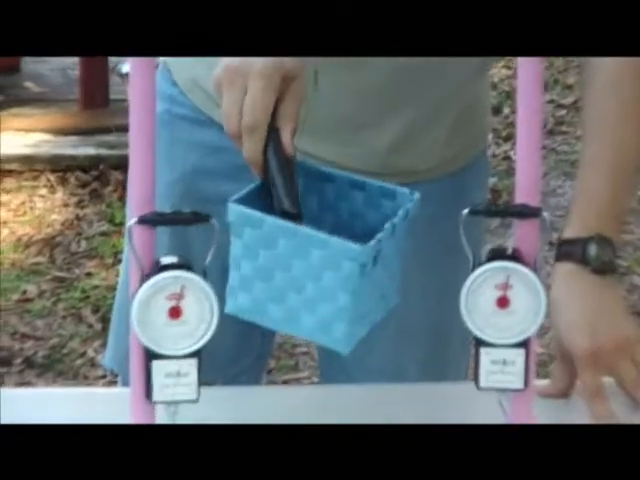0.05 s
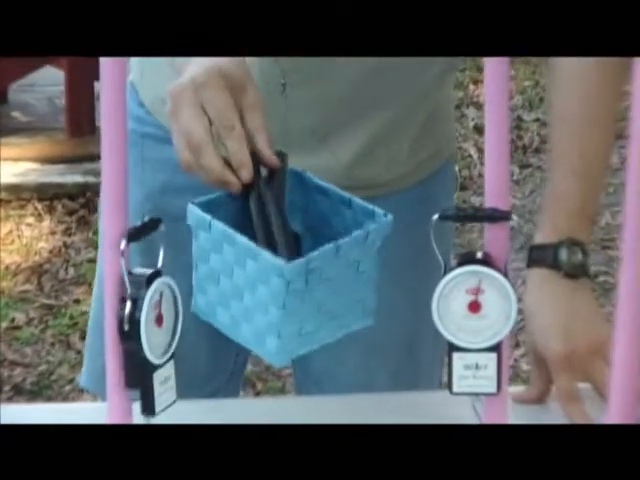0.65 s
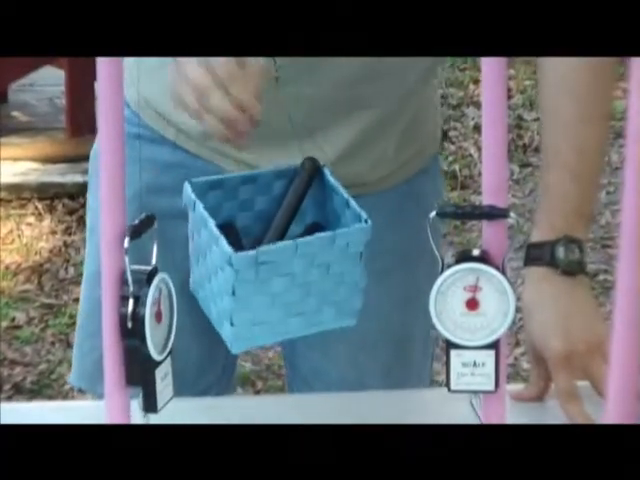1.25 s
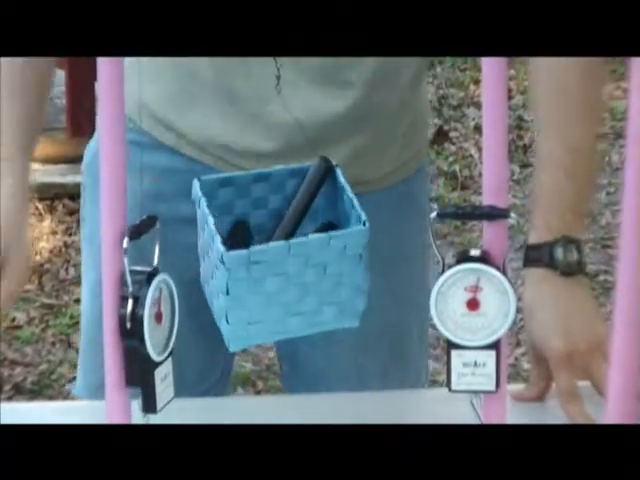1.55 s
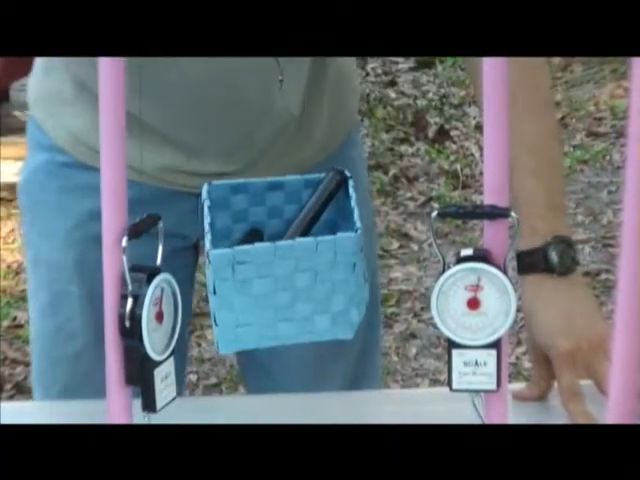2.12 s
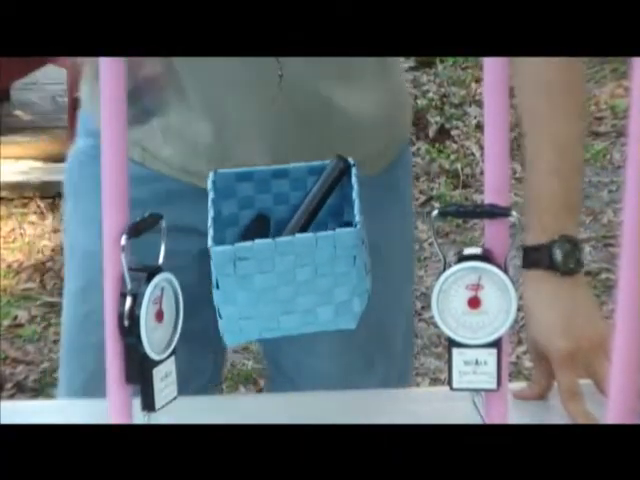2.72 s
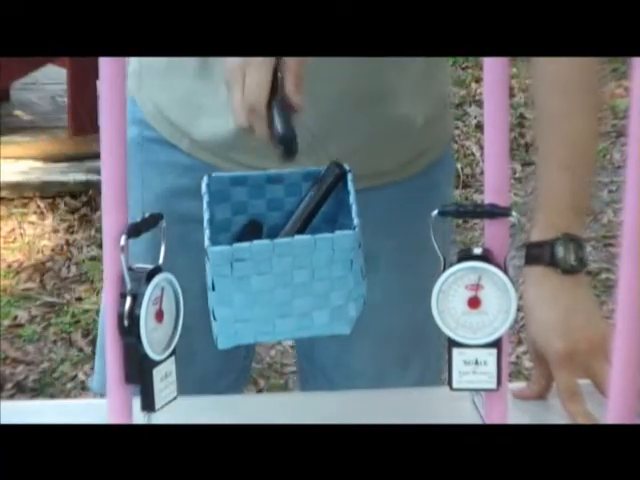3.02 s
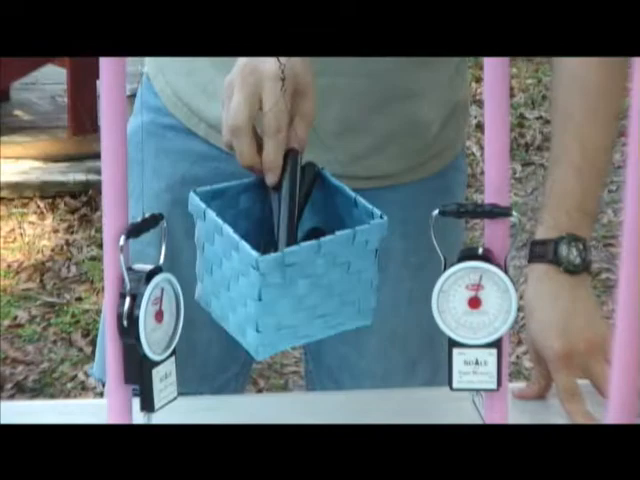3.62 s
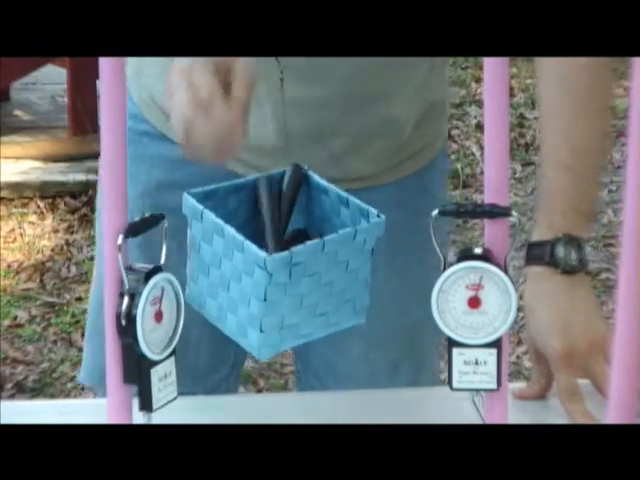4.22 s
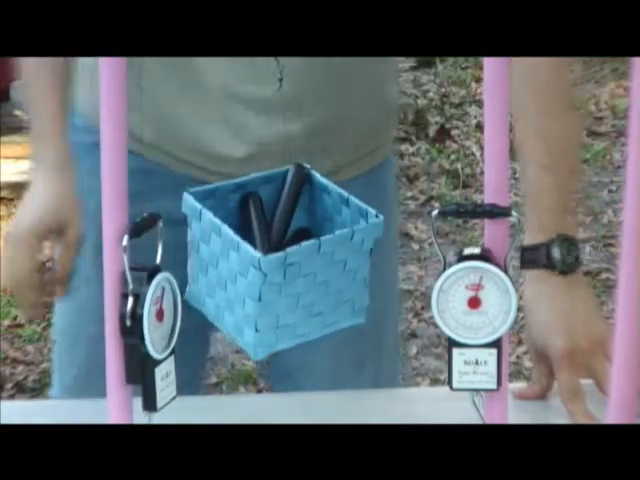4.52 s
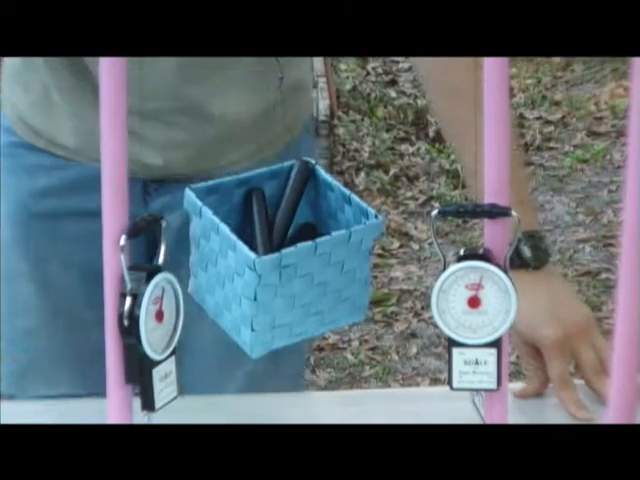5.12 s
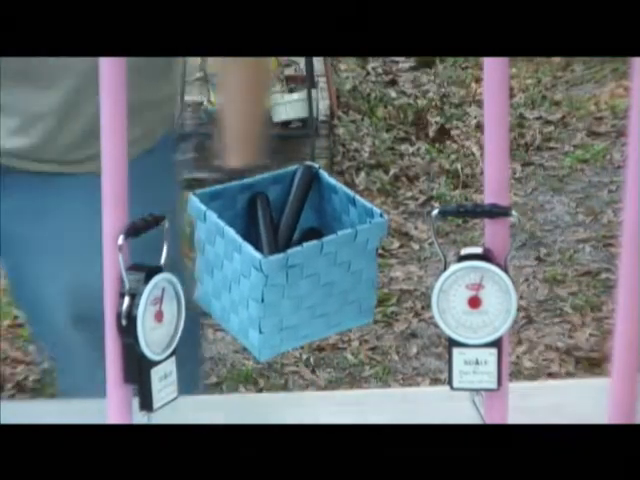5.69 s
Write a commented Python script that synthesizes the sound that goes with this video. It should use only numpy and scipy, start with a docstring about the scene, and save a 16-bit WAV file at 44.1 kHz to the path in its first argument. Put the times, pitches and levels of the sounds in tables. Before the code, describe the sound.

Metal weights clatter into a plastic basket in two bunches, with a drag across a table between, two close snaps and birds chirping.

```python
"""Steel rod weights clink, chatter and squeal as they are lowered one by one into a woven plastic basket.
Each contact rings a rod and the pile and shakes the basket, which hangs in a yard; rods rub on the weave.
Between two loads the next rod knocks and drags over a table. Clothes rustle, two dry snaps sound at the
microphone, and birds chip and call over outdoor air and a distant motor's hum."""
import sys
import numpy as np
from scipy import signal
from scipy.fft import rfft, irfft, next_fast_len
from scipy.io import wavfile
from scipy.ndimage import map_coordinates

SR = 44100
rng = np.random.default_rng(int(sys.argv[2]) if len(sys.argv) > 2 else 0)


def inscribe(sig):
    """Save sig as 16-bit PCM at rate SR to the path in sys.argv[1].

    A 1-D sig is mono; a 2-D sig holds one channel per row.
    Samples are clipped to [-1, 1] before scaling.
    """
    pcm = np.round(np.clip(np.atleast_2d(sig).T, -1, 1) * 32767)
    wavfile.write(sys.argv[1], SR, pcm.astype(np.int16))


N = 258173


def amp(db):
    """Decibels to gain."""
    return 10 ** (np.asarray(db) / 20)

def unit(x):
    """Scale to rms 1."""
    return x / np.sqrt(np.mean(x ** 2) + 1e-20)

def along(points, hz):
    """Interpolate (frequency, value) points on a log axis."""
    knots_hz, values = np.transpose(points)
    return np.interp(np.log(hz + 1), np.log(knots_hz + 1), values)

def wobble(rate_hz, size=N):
    """Smooth random curve, rate_hz knots a second."""
    knots = rng.standard_normal(int(size * rate_hz / SR) + 4)
    return map_coordinates(knots, [np.arange(size) * rate_hz / SR])

def filtered(x, response):
    """Apply a complex frequency response."""
    size = x.shape[-1]
    padded = next_fast_len(size + 8192)
    return irfft(rfft(x, padded) * response(np.fft.rfftfreq(padded, 1 / SR)), padded)[..., :size]

def band(x, low_hz, high_hz):
    """Causal band-pass."""
    return signal.sosfilt(signal.butter(2, [low_hz, high_hz], "bandpass", fs=SR, output="sos"), x)

def resonate(x, resonances):
    """Parallel resonators of alternating sign."""
    return filtered(x, lambda f: sum(
        (-1) ** k * amp(db) * 1j * f * width_hz / (hz * hz - f * f + 1j * f * width_hz)
        for k, (hz, width_hz, db) in enumerate(resonances)))

def noise(spectrum, size=N, grain_db=0):
    """Coloured noise of rms 1; grain_db breaks it into tiny slips."""
    slips = rng.standard_normal(size) * amp(grain_db * wobble(700, size))
    return unit(filtered(slips, lambda hz: amp(along(spectrum, hz))))

def pulse(spectrum, size=2048):
    """Minimum-phase click, peak 1."""
    hz = np.fft.rfftfreq(size, 1 / SR)
    cepstrum = irfft(np.log(amp(along(spectrum, hz))))
    log_response = rfft(2 * cepstrum[1:size // 2], size) * np.exp(-2j * np.pi * hz / SR)
    click = irfft(np.exp(log_response))
    return click / np.abs(click).max()

def add(track, s, sound):
    """Mix a sound in at s seconds."""
    part = track[max(round(s * SR), 0):][:len(sound)]
    part += sound[:len(part)]

def strokes(rows, rise_s, t60_s, size=N):
    """Envelope of strokes that rise, hold and decay."""
    t = np.arange(size) / SR
    return sum(amp(db - 60 * np.maximum(t - s - length_s, 0) / t60_s) * np.clip((t - s) / rise_s, 0, 1)
               for s, length_s, db in rows)

def ring(modes, lift_db=0, above_hz=5000, scatter_db=0, detune=0, rattle=0):
    """Damped modes; hard contact lifts the upper ones, a loose seat jostles phase and level."""
    t = np.arange(SR // 3) / SR
    hz, db, t60_s = np.transpose(modes)[:, :, None]
    db = db + lift_db * (hz > above_hz) + scatter_db * rng.standard_normal(hz.shape)
    hz = hz * (1 + detune * rng.standard_normal(hz.shape))
    jostle = rattle * wobble(173, len(t))
    phase = 2 * np.pi * hz * t + jostle * rng.choice([-1, 1], hz.shape)
    return np.exp(jostle[::-1] / 2) * np.sum(amp(db - 60 * t / t60_s) * np.sin(phase), axis=0)

def whistle(length_s, first_hz, last_hz, waver, overtone_db):
    """Swelling, gliding, unsteady tone with two overtones."""
    progress = np.linspace(0, 1, int(length_s * SR))
    glide_hz = first_hz + (last_hz - first_hz) * np.sin(np.pi / 2 * progress)
    hz = glide_hz * (1 + waver * wobble(600, len(progress)))
    phase = 2 * np.pi * np.cumsum(hz) / SR
    return np.sin(np.pi * progress) * sum(amp(k * overtone_db) * np.sin((k + 1) * phase) for k in range(3))


# air spectrum: (frequency [Hz], gain [dB])
AIR_SPECTRUM = [(15, -36), (25, -15), (45, -14), (70, -6), (110, -8), (160, -3.5), (335, -4), (600, -2.5),
                (950, -9), (1300, -4), (1900, -10.5), (3600, -16), (9300, -22), (16000, -26.5)]
# left-right likeness: (frequency [Hz], correlation [-1..1])
AIR_CORRELATION = [(60, .93), (180, .88), (550, .87), (1650, .65), (5000, .35), (15000, -.3)]

def air(level_db=-54.4):
    """Outdoor air, wider in the treble."""
    def spread(hz):
        angle = np.arccos(along(AIR_CORRELATION, hz)) / 2
        return np.array([np.cos(angle), np.sin(angle)])
    mid, side = filtered(np.array([noise(AIR_SPECTRUM), noise(AIR_SPECTRUM)]), spread)
    return amp(level_db + 1.1 * wobble(6.1)) * unit(np.array([mid + side, mid - side]))

# motor partials: (frequency [Hz], rms level [dB])
MOTOR_PARTIALS = [(74, -67), (149, -67), (295, -74), (465, -74), (560, -76)]

def motor():
    """A distant motor hums, slightly unsteady."""
    clock_s = np.cumsum(1 + .02 * wobble(6)) / SR
    return sum(amp(db + 1.5 * wobble(2)) * np.sqrt(2) * np.sin(2 * np.pi * hz * clock_s)
               for hz, db in MOTOR_PARTIALS)

# rod on weave: (time [s], length [s], level [dB])
RUBS = [(0, 0.097, -45), (.55, 0.28, -51), (.98, .13, -48), (1.23, 0.055, -54), (3.49, 0.31, -47),
        (4.045, .16, -46), (4.38, .08, -51)]
# friction spectrum: (frequency [Hz], gain [dB])
RUB_SPECTRUM = [(70, -24.5), (170, -5), (550, 3), (1100, -2), (2200, -7.5), (4500, -15.5), (9000, -26.5),
                (16000, -30)]

def rubs():
    """A rod is eased down the weave in tiny slips."""
    return strokes(RUBS, rise_s=.014, t60_s=.22) * noise(RUB_SPECTRUM, grain_db=5)

# free modes by rod: (frequency [Hz], gain [dB], t60 [s])
ROD_MODES = { "long": [(3782, 0, .26), (5900, -23, .13), (7660, -29, .25), (9799, -6, .11),
             (11036, -21, .16), (13700, -23, .1)], "thick": [(4025, 0, .2), (6379, -24, .12),
             (7946, -24, .18), (10370, -16, .09), (10860, -22, .1), (11340, -22, .1)],
             "middle": [(4129, 0, .22), (6508, -20, .22), (8027, -25, .26), (10406, -8, .18),
             (11600, -28, .18), (14312, -21, .15)], "short": [(4243, 0, .28), (7461, -32, .25),
             (8142, -21, .25), (10810, -21, .2), (11360, -33, .25), (12040, -27, .23)], }
# modes of rods pressed together: (frequency [Hz], gain [dB], t60 [s])
PILE_MODES = [(4040, -16.5, 0.12), (4196, -7.5, .12), (4190, -5, 0.14), (4360, -5.5, 0.14),
              (4240, -6.5, .11), (4567, -1.5, 0.045), (6550, -21.5, .08), (8410, -15.5, 0.093),
              (8900, -28, .09), (11300, -24.5, .12), (11300, -25.5, .1), (12400, -21, .09),
              (14500, -29.5, .1)]
# contact crack: (frequency [Hz], gain [dB])
CRACK_SPECTRUM = [(100, -27.5), (600, -18.5), (1500, -6.5), (3200, 0.5), (4400, -3), (6000, -10),
                  (7500, -11), (10500, -31.5), (16000, -32.5)]
# extra bite of a heavy blow: (frequency [Hz], gain [dB])
BITE_SPECTRUM = [(2000, -35.5), (4200, -16), (5200, -1), (6100, -0.5), (7200, -18.5), (12000, -30),
                 (16000, -39)]
# shaken weave: (frequency [Hz], gain [dB])
WEAVE_SPECTRUM = [(60, -10.5), (160, 0), (550, -2.5), (1000, -9.5), (2200, -6), (4500, -0.5), (7000, -8),
                  (11000, -13.5), (16000, -16.5)]
# hollow basket notes: (frequency [Hz], width [Hz], gain [dB])
BASKET_RESONANCES = [(176, 66, -3), (241, 40, -3), (334, 50, -7.5), (508, 60, -7.5), (558, 110, 1),
                     (710, 98, -9)]
# rod on rod: (time [s], rod, blow [dB], rod ring [dB], overtone lift [dB], pile ring [dB])
CLINKS = [ (.001, "thick", -29, -32, -3, -43), (.077, "thick", -30, -38, -9, -33),
          (0.0878, "thick", -12, -26, 4, -27), (.558, "long", -40, -42, -18, -52),
          (0.593, "middle", -21, -32, -6, -34), (.678, "long", -22, -40, -3, -31),
          (0.7455, "middle", -19.5, -26, -4, -29), (.771, "long", -10.5, -25, 3, -20),
          (0.805, "long", -20, -42, 4, -50), (.8488, "long", -13, -39, 24, -27),
          (.9626, "middle", -5.5, -23, 3, -45), (.966, "long", -32, -24, 1, -22),
          (1.0329, "middle", -19.5, -27, 0, -29), (2.058, "long", -28, -43, -15, -39),
          (2.374, "short", -15, -38.5, -10, -42), (2.418, "short", -31, -39, -7, -37),
          (2.584, "short", -40, -51, -7, -52), (2.887, "short", -27, -60, 2, -48),
          (3.273, "short", -32, -53, 2, -55), (3.486, "short", -18, -25, -3.5, -35),
          (3.574, "short", -20, -29, 4, -41), (3.676, "short", -22, -50, 5, -38),
          (3.691, "short", -16, -29, -1, -30), (3.764, "short", -25.5, -50, 0, -37),
          (3.7934, "short", -29, -52, -6, -42), (4.132, "short", -15.5, -34.5, 0.5, -31),
          (4.197, "short", -11, -27, 8, -18), (4.239, "short", -19, -42, 12, -34),
          (4.42, "short", -34, -46, -4, -48), ]

def clinks(grip_db_per_s=18, shake_t60_s=.11, chatter_t60_s=.012, thud_t60_s=.14, firm_db=-32):
    """Each contact cracks, chatters, rings one rod and the pile, and shakes the basket."""
    out, thuds, t = np.zeros(N), np.zeros(N), np.arange(SR // 7) / SR
    crack, bite = pulse(CRACK_SPECTRUM), pulse(BITE_SPECTRUM)
    for s, rod, blow_db, ring_db, lift_db, pile_db in CLINKS:
        clink = amp(ring_db) * ring(ROD_MODES[rod], lift_db, scatter_db=.5, detune=.00018, rattle=.22)
        clink += amp(pile_db) * ring(PILE_MODES, scatter_db=1.5, detune=.0099, rattle=1)
        age_s = np.arange(len(clink)) / SR
        clink *= amp(-grip_db_per_s * age_s)  # fingers and weave drain the ring
        weave = amp(blow_db - 20 - 60 * t / shake_t60_s) * noise(WEAVE_SPECTRUM, len(t), grain_db=.5)
        chatter = amp(blow_db - 60 * t / chatter_t60_s) * noise(CRACK_SPECTRUM, len(t), grain_db=2.5)
        add(clink, 0, weave + .26 * chatter)
        rise_s = .001 * amp(.66 * (firm_db - blow_db))  # lighter blows build more slowly
        add(out, s, (1 - np.exp(-age_s / rise_s)) * clink)
        add(out, s, amp(-2 + 1.13 * blow_db) * crack)
        add(out, s, amp(9 + 2.6 * blow_db) * bite)
        add(thuds, s, amp(-19 + .46 * blow_db - 60 * t / thud_t60_s) * rng.standard_normal(len(t)))
    return out + resonate(thuds, BASKET_RESONANCES)

# dull knocks: (time [s], level [dB], hardness [dB])
KNOCKS = [(.004, -25, -19), (1.071, -39, 11.5), (1.4678, -18, -18.5), (1.883, -21, -28), (2.179, -36, 5),
          (2.217, -30, 6), (2.326, -26, -12), (2.351, -26, -20), (2.372, -27, -19), (5.467, -36.5, -9.5),
          (5.57, -38, -13)]
# knock modes: (frequency [Hz], gain [dB], t60 [s])
KNOCK_MODES = [(333, -18.5, 0.024), (622, -2, 0.015), (701, -13.5, 0.091), (1160, -1, .008),
               (2400, -6.5, 0.0079)]

def knocks(bounce_s=.021, bounce_db=-15):
    """A rod knocks on the table and bounces once."""
    out = np.zeros(N)
    for s, db, hard_db in KNOCKS:
        for at_s, level_db in (s, db), (s + bounce_s, db + bounce_db):
            add(out, at_s, amp(level_db) * ring(KNOCK_MODES, hard_db, above_hz=1000, detune=.04))
    return band(out, 305, 4700)

# steel slipping on steel: (time [s], pitch [Hz], level [dB])
SQUEALS = [(.0845, 4510, -13.5), (2.004, 4570, -22), (2.249, 4520, -29.5), (2.366, 4195, -24),
           (3.687, 4340, -27), (4.127, 4530, -21), (4.193, 4410, -15), (4.225, 4320, -28)]
# steel friction hiss: (frequency [Hz], gain [dB])
STEEL_SPECTRUM = [(1200, -20), (2300, -6), (3500, -10.5), (4250, 14), (5000, -9.5), (6300, -18),
                  (7300, -14), (8200, -11), (10800, -19), (16000, -27.5)]

def squeals(slip_s=.016, ring_t60_s=.09, partner_ratio=.91, partner_db=-14):
    """Two rods squeal as one slips over the other; the upper note rings on."""
    out, size = np.zeros(N), int(slip_s * SR)
    window = signal.windows.tukey(size)
    for s, hz, db in SQUEALS:
        for pitch_hz, level_db in (hz, db), (hz * partner_ratio, db + partner_db):
            add(out, s, amp(level_db) * whistle(slip_s, pitch_hz, pitch_hz, waver=.018, overtone_db=-26))
        add(out, s + slip_s / 2, amp(db - 19) * ring([(hz, 0, ring_t60_s)], rattle=.91))
        add(out, s, amp(db - 11.5) * window * noise(STEEL_SPECTRUM, size, grain_db=8.5))
        add(out, s, amp(db - 22.5) * window * noise(WEAVE_SPECTRUM, size, grain_db=2.5))
    return out

# bird chips: (time [s], start pitch [Hz], level [dB])
CHIPS = [(.432, 5070, -51), (1.725, 5400, -56), (1.94, 5200, -53.5), (2.678, 5400, -56),
         (3.345, 5050, -40.5), (3.831, 5200, -61), (4.541, 6000, -42.5), (5.236, 4650, -42.5),
         (5.63, 5300, -53)]

def bird_chips(length_s=.021, glide_ratio=1.1):
    """A small bird whistles thin rising chips."""
    out = np.zeros(N)
    for s, hz, db in CHIPS:
        add(out, s, amp(db) * whistle(length_s, hz, hz * glide_ratio, waver=.05, overtone_db=-22))
    return out

# rod sliding along rods: (time [s], length [s], level [dB], rod)
SCRAPES = [(.5, .2, -52, "middle"), (.975, .08, -42, "middle"), (1.22, .04, -59, "middle"),
           (3.56, .18, -48, "short"), (4.05, .07, -62, "short")]

def scrapes(ring_db=-1):
    """A sliding rod hisses; tiny catches keep it ringing."""
    out, size = np.zeros(N), SR // 2
    for s, length_s, db, rod in SCRAPES:
        catches = rng.standard_normal(size) * amp(6 * wobble(300, size))
        ringing = unit(signal.fftconvolve(catches, ring(ROD_MODES[rod], lift_db=-2, rattle=.5), "same"))
        hiss = noise(STEEL_SPECTRUM, size, grain_db=4.5)
        envelope = strokes([(0, length_s, db)], rise_s=.04, t60_s=.24, size=size)
        add(out, s, envelope * (hiss + amp(ring_db) * ringing))
    return out

# body moves: (time [s], length [s], level [dB])
MOVES = [(1.87, .22, -52.5), (5.03, 0.16, -55.5), (5.17, 0.1, -53), (5.41, 0.042, -54), (5.48, 0.22, -64)]
# rustle spectrum: (frequency [Hz], gain [dB])
FABRIC_SPECTRUM = [(200, 5.5), (600, -1), (2500, 3.5), (5000, -5), (10000, -4), (16000, -17)]

def clothes():
    """Fabric brushes with each move."""
    return strokes(MOVES, rise_s=.046, t60_s=.21) * noise(FABRIC_SPECTRUM, grain_db=2.5)

# pulls over the table: (time [s], length [s], level [dB])
PULLS = [(1.877, 0.42, -41.5), (2.065, 0.056, -29.5), (2.315, .05, -36), (2.47, .14, -51.5)]
# table resonances: (frequency [Hz], width [Hz], gain [dB])
TABLE_RESONANCES = [(151.6, 29, 2), (196, 48, -1), (259.5, 23.5, 0.5), (325, 28, 1.5), (466, 76, 0),
                    (592, 36, 2.5), (693, 31, 3.5), (860, 290, -8.5), (1177, 240, -6.5)]
# grit under the rod: (frequency [Hz], gain [dB])
GRIT_SPECTRUM = [(300, -14), (900, 0), (2200, -2.5), (5000, -6), (8000, -31), (16000, -38)]

def drag(bumps_db=.8, grit_db=-16):
    """A dragged rod catches and lets go, driving the table and scratching over grit."""
    slips = rng.standard_normal(N) * amp(3.15 * wobble(400))
    envelope = strokes(PULLS, rise_s=.023, t60_s=.18) * amp(bumps_db * wobble(45))
    grit = amp(grit_db) * noise(GRIT_SPECTRUM, grain_db=5)
    return envelope * (unit(resonate(slips, TABLE_RESONANCES)) + grit)

# bird call: (time [s], length [s], start pitch [Hz], end pitch [Hz], level [dB])
CALL = (2.8, .17, 4000, 4550, -42)

def bird_call(lower_ratio=.9, lower_db=-3):
    """A larger bird gives one harsh, rising, two-voiced call."""
    out = np.zeros(N)
    s, length_s, first_hz, last_hz, db = CALL
    for ratio, voice_db in (1, db), (lower_ratio, db + lower_db):
        voice = whistle(length_s, ratio * first_hz, ratio * last_hz, waver=.04, overtone_db=-16)
        add(out, s, amp(voice_db) * voice)
    return out

# snap clicks, the first two heard as one: (time [s], level [dB], brightness [dB])
SNAPS = [(4.5357, 0, 15.5), (4.5365, 3, 2), (4.8304, 6.5, 0.5)]
# snap spectrum: (frequency [Hz], gain [dB])
SNAP_SPECTRUM = [(200, -37), (550, -20), (950, -11.5), (1850, -3), (2700, -7.5), (3700, -14), (4900, -22.5),
                 (5700, -8.5), (6800, -17), (8300, -15.5), (10000, -21), (14000, -21), (16000, -26.5)]

def snaps(lag_rad=4, tail_db=-38, tail_t60_s=.056):
    """Dry snaps, treble ahead of bass, each with a faint rattle after it."""
    out, t = np.zeros(N), np.arange(SR // 10) / SR
    for s, db, bright_db in SNAPS:
        spectrum = [(hz, gain_db + bright_db * (hz > 4500)) for hz, gain_db in SNAP_SPECTRUM]
        snap = filtered(pulse(spectrum), lambda hz: np.exp(-1j * lag_rad * np.log(hz + 300)))
        add(out, s, amp(db) * snap)
        add(out, s, amp(db + tail_db - 60 * t / tail_t60_s) * noise(spectrum, len(t)))
    return out

# yard decay: (frequency [Hz], t60 [s])
YARD_DECAY = [(200, 0.16), (2000, 0.42), (5000, 0.39), (12000, 0.3)]

def yard(x, gap_s=.0072):
    """Diffuse reflections from ground, table and trees, different left and right."""
    hz, t, spectra = signal.stft(rng.standard_normal((2, SR // 2)), SR, nperseg=256)
    decay = amp(-60 * t / along(YARD_DECAY, hz)[:, None])
    tail = signal.istft(spectra * decay, SR, nperseg=256)[1]
    tail = np.pad(tail / np.linalg.norm(tail[0]), ((0, 0), (int(gap_s * SR), 0)))
    return signal.fftconvolve(x[None], tail, axes=1)[:, :N]

def pan(x, lead_ms, left_db):
    """A near source arrives earlier and left_db louder on the left."""
    sides = np.array([[.5], [-.5]])
    return amp(sides * left_db) * filtered(x, lambda hz: np.exp(2j * np.pi * sides * hz * lead_ms / 1000))

def scene():
    """Basket and table in front, snaps close on the left, birds far off."""
    steel = band(clinks() + squeals() + scrapes(), 54, 19000)  # small things radiate little bass
    near = steel + rubs() + drag() + knocks() + clothes()
    snap = snaps()
    birds = bird_chips() + bird_call()
    front = pan(near, lead_ms=.013, left_db=0) + amp(-15.5) * yard(near)
    close = pan(snap, lead_ms=.03, left_db=3) + amp(-25.5) * yard(snap)
    far = amp(-3.5) * birds + amp(-.5) * yard(birds)
    return front + close + far + air() + motor()

def record(dry):
    """Hard limit at full scale, then a steep low-pass."""
    cutoff_hz = 16450
    return filtered(np.clip(dry, -1, 1), lambda hz: 1 / (1 + (hz / cutoff_hz) ** 120))


dry = scene()
out = record(dry)
inscribe(out)
```